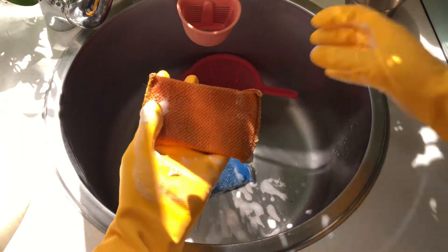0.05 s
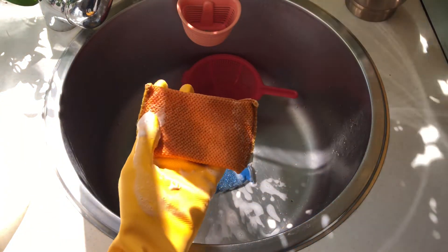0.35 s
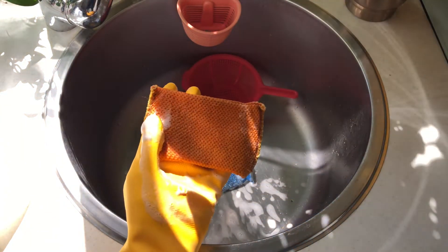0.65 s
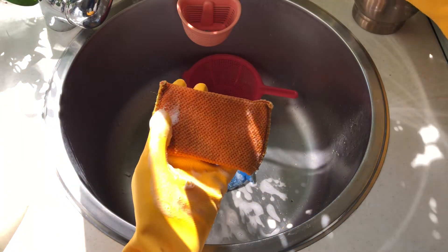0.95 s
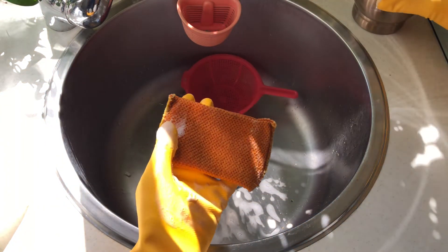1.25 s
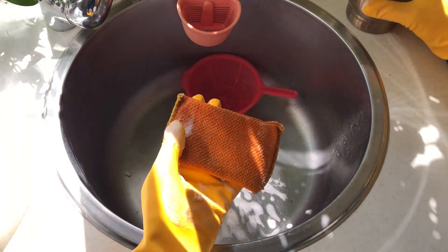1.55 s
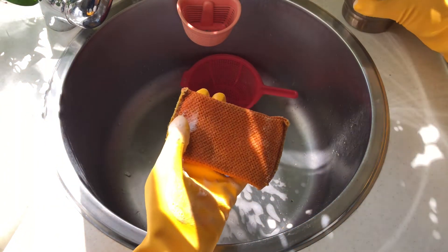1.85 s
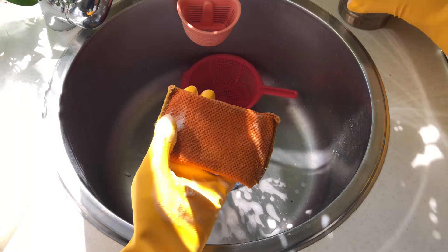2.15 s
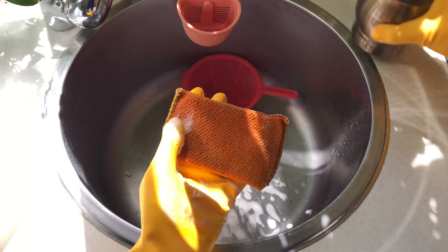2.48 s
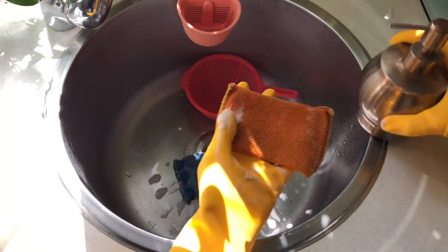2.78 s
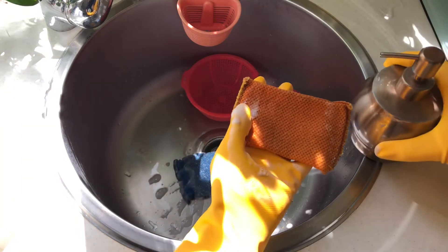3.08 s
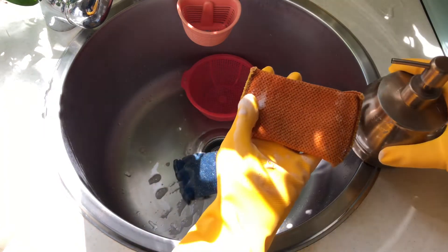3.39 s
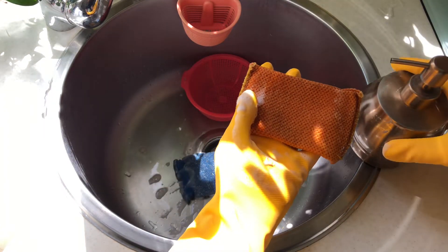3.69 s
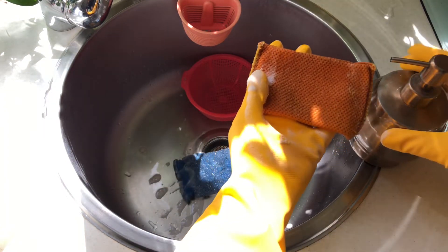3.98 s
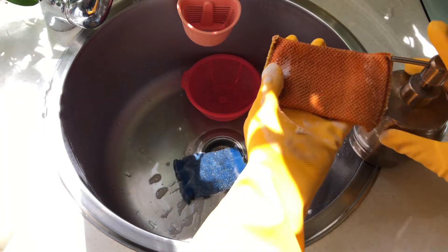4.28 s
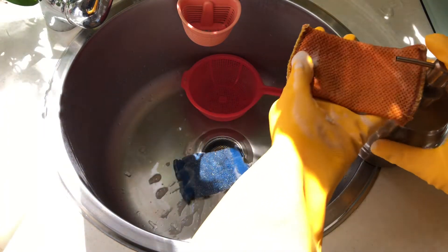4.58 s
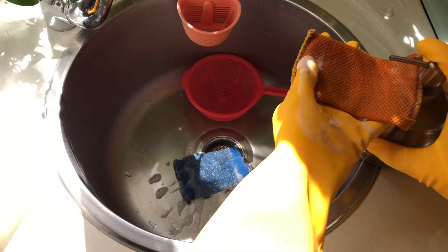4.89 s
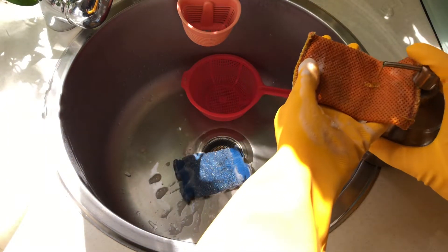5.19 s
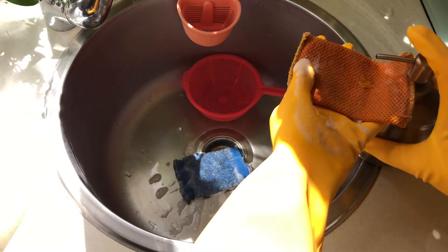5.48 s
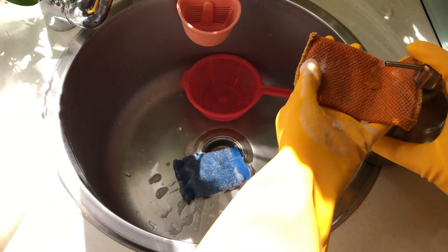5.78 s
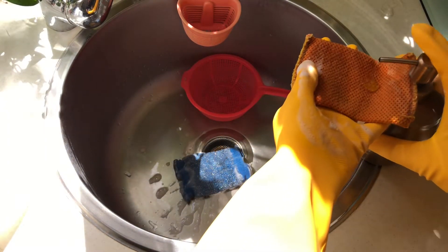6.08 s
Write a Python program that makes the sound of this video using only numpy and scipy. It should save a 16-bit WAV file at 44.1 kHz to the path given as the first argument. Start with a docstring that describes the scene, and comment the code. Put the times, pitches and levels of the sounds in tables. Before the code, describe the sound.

Heard up close at a kitchen sink, a metal soap bottle scrapes over the counter in little jerks and bumps down on its base. Three ringing knocks against the steel rim make the basin boom, followed by a short groaning scrape. Then the pump gives low clunks and small spits of soap. Soft rubber glove rustling on a wet sponge and a low room murmur run underneath.

```python
"""In a small, quiet kitchen, rubber gloves rustle and tick on a wet sponge at a steel sink. One hand shoves
a metal soap dispenser over the counter: it scrapes by stick-slip friction and rocks onto its cushioned foot.
Then it knocks against the rim, so that its shell rings and counter and basin boom, and drags groaning along
the steel. After a light knock and a brief judder, the pump clunks and spits soap onto the sponge.
At last the hands come to rest."""
import sys
import numpy as np
from scipy import signal
from scipy.fft import rfft, irfft
from scipy.io import wavfile

SR = 44100
rng = np.random.default_rng(int(sys.argv[2]) if len(sys.argv) > 2 else 0)


def waveform_to_disk(signal):
    """Save audio, clipped to [-1, 1], as 16-bit WAV at the path in sys.argv[1]."""
    frames = np.transpose(np.atleast_2d(signal))
    scaled = np.clip(frames, -1, 1) * 32767
    samples = np.round(scaled).astype(np.int16)
    wavfile.write(sys.argv[1], SR, samples)


N = 275625

# modes of counter and basin: pitch_hz, level_db, t60_s
COUNTER_MODES = [(116.6, -12, 0.28), (157.5, -5, 0.2), (226, -20, 0.34), (251, 1, 0.039), (290.7, 1, 0.34),
                 (353, -10.5, 0.2), (418.4, 0, 0.14), (505.6, -5.5, 0.17), (610, -8, 0.075),
                 (645, -7, 0.14), (814, -19.5, 0.48), (919, -12, 0.19)]
# noise spectrum of a dull thud: frequency_hz, level_db, t60_s
THUD_BANDS = [(40, -30, 0.17), (105, 7.5, 0.21), (192, 4, 0.094), (300, -7, 0.57), (550, -7, 0.29),
              (970, -1, 0.04), (1670, -1.5, 0.074), (2220, -21, 0.08), (4140, -14.5, 0.05),
              (7000, -43, 0.042)]
# noise spectrum of a small snap: frequency_hz, level_db, t60_s
SNAP_BANDS = [(500, -6, 0.026), (1620, 1.5, 0.042), (2780, -3.5, 0.056), (4100, -19, 0.037),
              (7100, -8.5, 0.013), (8800, -29, 0.06), (12900, -17, 0.041), (15900, -30, .02)]


def undb(db):
    """Amplitude grows tenfold for every 20 decibels."""
    return 10 ** (np.asarray(db) / 20)


def unit(x):
    """Normalisation to an rms of 1."""
    return x / np.sqrt(np.mean(x ** 2))


def seconds():
    """Time axis of one transient."""
    return np.arange(SR * 2 // 3) / SR


def add(out, start_s, sound):
    """Superposition: a sound adds to the mix from its start time on."""
    i = int(start_s * SR)
    out[i:i + len(sound)] += sound[:N - i]


def at_hz(hz, table, column=1):
    """Interpolation of a spectrum's column on a log-frequency axis."""
    table = np.array(table)
    return np.interp(np.log(hz + 1e-9), np.log(table[:, 0]), table[:, column])


def tint(x, spectrum, peaks=(), peak_db=0):
    """Source and filter: x takes on a broad spectrum with Lorentzian resonances standing on it."""
    hz = np.fft.rfftfreq(len(x), 1 / SR)
    lift = sum(undb(db + peak_db) ** 2 / (1 + (2 * (hz - f) / width) ** 2) for f, width, db in peaks)
    return irfft(rfft(x) * undb(at_hz(hz, spectrum)) * np.sqrt(1 + lift), len(x))


def wander(per_s):
    """Slow random modulation: straight lines between Gaussian values of spread 1."""
    knots = rng.standard_normal(N // 50)
    return np.interp(np.arange(N) / SR * per_s, np.arange(len(knots)), knots)


def grains(per_s, spread_db):
    """Shot noise: tiny clicks at random times, a few much bigger than the rest."""
    hit = rng.random(N) < per_s / SR
    return unit(hit * rng.choice([-1, 1], N) * undb(spread_db * np.minimum(rng.exponential(size=N), 4)))


def ring(modes, split=0):
    """Damped modes of alternating sign; in a shell not quite round, each splits into a beating pair."""
    t, out = seconds(), 0
    for k, (hz, db, t60) in enumerate(modes):
        offset_hz = hz * split * (rng.random() + .5)
        pair = np.sin(2 * np.pi * hz * t) * np.cos(2 * np.pi * offset_hz * t)
        out = out + (-1) ** k * undb(db) * pair * np.exp(-np.log(1000) * t / t60)
    return out


def burst(bands, count=18):
    """Modal overlap: dense modes merge into noise that decays at its own rate in each band."""
    t, out = seconds(), 0
    noise = rfft(unit(tint(rng.standard_normal(len(t)), bands)))
    hz, centres = np.fft.rfftfreq(len(t), 1 / SR), np.geomspace(50, 16000, count)
    for centre, weights in zip(centres, np.eye(count)):
        band = irfft(noise * np.interp(hz, centres, weights), len(t))
        out = out + band * np.exp(-np.log(1000) * t / at_hz(centre, bands, column=2))
    return out


def stroke(peak_s, rise_s, fall_s, shape=1.38):
    """Speed envelope of a hand movement, peaking at 1; shape 1 is pointed, 2 rounded."""
    t = np.arange(N) / SR - peak_s
    return np.exp(-np.abs(t / np.where(t < 0, rise_s, fall_s)) ** shape)


def background():
    """Cavity resonance: the hollow of the basin colours the low murmur of the room."""
    # room noise: frequency_hz, level_db
    murmur = [(15, -44), (25, -13.5), (64, 4.5), (140, -4), (173, -6.5), (281, -2), (378, -17), (523, -9),
              (582, -16), (848, -16.5), (1110, -20), (1620, -24.5), (1950, -22), (2120, -27.5),
              (15500, -43)]
    # basin resonances: centre_hz, width_hz, level_db
    basin = [(297, 50, 1.0), (395, 81, 8.0), (490, 16.5, -27.0), (976, 190, -0.5)]
    air = unit(tint(rng.standard_normal(N), murmur, basin, peak_db=-0.5))
    return air * undb(.8 * wander(per_s=6) - 57)


def room(x, wet_db=-9, build_s=0.0017):
    """Reverberation: reflections from close tiled walls build a short, dense tail."""
    # tail spectrum: frequency_hz, level_db, t60_s
    bands = [(97, -2, 0.39), (300, -9, 0.51), (920, -4.5, 0.42), (2090, -9.5, 0.45),
             (5000, -7, 0.27), (15000, -3, 0.17)]
    tail = burst(bands) * swell(build_s)
    return x + undb(wet_db) * signal.fftconvolve(x, tail / np.linalg.norm(tail))[:N]


def gloves(creep_db=-68.5, settle_db_per_s=1.0, rest_s=6, fade_s=.12):
    """Friction noise: rubber creeps over damp sponge, louder at each new grip, fading as hands rest."""
    # new grips of the fingers: peak_s, rise_s, fall_s, level_db
    regrips = [(0.25, 0.029, 0.043, -63), (0.41, 0.053, 0.017, -62.5), (1.0, 0.018, 0.07, -66),
               (2.22, 0.23, 0.3, -69.5), (4.3, 0.12, 0.16, -66.5), (5.78, 0.17, 0.24, -70.5)]
    # rubber crackle: frequency_hz, level_db
    rubber = [(400, -20), (1100, -3.5), (2100, 3), (3200, -3.5), (5000, -7.5), (8000, -12.5),
              (15000, -17.5)]
    t = np.arange(N) / SR
    creep = undb(creep_db - settle_db_per_s * t) * np.exp(-np.maximum(t - rest_s, 0) / fade_s)
    grip_power = sum((undb(db) * stroke(*timing)) ** 2 for *timing, db in regrips)
    crackle = unit(tint(grains(per_s=2200, spread_db=3.2), rubber))
    return crackle * undb(2 * wander(per_s=24)) * np.sqrt(creep ** 2 + grip_power)


def tick(db, hz, width_hz, fade_s):
    """Impulsive excitation: a brief crack passes through a heavily damped resonance."""
    t = seconds()
    crack = rng.standard_normal(len(t)) * np.exp(-t / fade_s)
    resonance = signal.iirpeak(hz, hz / width_hz, fs=SR)
    click = unit(signal.lfilter(*resonance, signal.lfilter(*resonance, crack)))
    return undb(db) * click * np.sqrt(fade_s / (2 * t[-1]))


def ticks():
    """Sudden releases make transients: wet rubber peels, the valve clicks, the nozzle spits."""
    # rubber peeling off bottle and sponge: start_s, level_db, centre_hz
    peels = [(0.244, -52, 3600), (0.395, -57.5, 2850), (0.582, -57.5, 2600), (1.032, -53, 2240),
             (1.432, -55, 7150), (2.001, -58.5, 2500), (3.541, -65, 7000), (4.244, -55, 2200),
             (4.432, -61, 2480), (4.483, -63, 4940), (5.091, -66, 6000), (5.523, -69, 7000),
             (5.683, -62.5, 5260)]
    # pump valve just ahead of a stroke: start_s, level_db
    valve_clicks = [(4.703, -57), (4.902, -48)]
    # soap and air leaving the nozzle: start_s, level_db
    spits = [(5.262, -43.5), (5.926, -41), (5.995, -52)]
    out = np.zeros(N)
    for start_s, db, hz in peels:
        add(out, start_s, tick(db, hz, width_hz=0.99 * hz, fade_s=0.005))
    for start_s, db in valve_clicks:
        add(out, start_s, tick(db, hz=12500, width_hz=7000, fade_s=0.0027))
    for start_s, db in spits:
        add(out, start_s, tick(db, hz=1840, width_hz=500, fade_s=0.0039))
    return out


def grit(whistle_db=-12):
    """Roughness noise: fine scratching excites high modes that flare up as the contact point moves."""
    # high resonances of the base: centre_hz, width_hz, level_db
    resonances = [(5410, 210, 6.5), (6340, 320, 4), (7810, 90, 2.5), (8160, 110, 1.5), (9500, 910, 3),
                  (11140, 190, -2.5), (13200, 300, -5), (14700, 250, -11)]
    # scratching hiss: frequency_hz, level_db
    hiss = [(3000, 1.5), (5000, 2.5), (9000, -1), (12000, -2.5), (16000, -1.5)]
    scratch, whistles = grains(per_s=2200, spread_db=2.2), 0
    for hz, width_hz, db in resonances:
        whistle = unit(signal.lfilter(*signal.iirpeak(hz, hz / width_hz, fs=SR), scratch))
        whistles = whistles + undb(db + whistle_db + 4 * wander(per_s=35)) * whistle
    return unit(unit(tint(scratch, hiss)) + whistles)


def rim_drag(jerks, slips, hiss, start_s=2.965, attack_s=0.032, hold_s=0.083, release_s=0.1):
    """Friction drives the rim's resonances; as the base slows, the hiss dies first, the groan last."""
    # steel rim resonances: centre_hz, width_hz, level_db
    rim = [(417, 62, 9), (495.6, 36, -7), (790, 15, 0.5), (1920, 40, -4), (3195, 36, 2), (3220, 25, 3),
           (3490, 55, -1), (4130, 26, 2.5)]
    # low groan: frequency_hz, level_db
    groan_spectrum = [(70, -26), (180, -16), (260, -12), (350, -14), (500, -4.5), (650, -13), (850, -7),
                      (1100, -19), (2000, -50)]
    # bright scrape: frequency_hz, level_db
    scrape_spectrum = [(600, -30), (1100, -12), (1700, 5.5), (2400, -8.5), (4300, 0.5), (6000, -39)]
    t = np.arange(N) / SR - start_s
    onset = np.clip(t / attack_s, 0, 1)
    slowing_s = np.maximum(t - attack_s - hold_s, 0)
    speed = onset * np.exp(-(slowing_s / release_s) ** 2)
    lingering = onset * np.exp(-(slowing_s / 0.14) ** 2)
    groan = undb(-50.5) * unit(tint(jerks, groan_spectrum, rim, peak_db=15))
    scrape = undb(-54.5) * unit(tint(slips, scrape_spectrum, rim, peak_db=15))
    return lingering * groan + speed * scrape + speed ** 2.1 * undb(-55) * hiss


def slides(rumble_lag_s=0.0058):
    """Stick-slip friction: coarse jerks of the base shake counter or rim, fine slips excite the metal."""
    # shoves over the counter: peak_s, rise_s, fall_s, rumble_db, scrape_db, hiss_db
    shoves = [(0.725, 0.036, 0.048, -43.5, -58.5, -74), (0.795, 0.054, 0.05, -51.5, -52.5, -49),
              (0.855, 0.023, 0.055, -41, -53.5, -67), (1.473, 0.037, 0.04, -41.5, -53, -59),
              (1.575, 0.052, 0.041, -46, -59.5, -67), (2.135, 0.065, 0.023, -45.5, -58.5, -63),
              (2.345, 0.087, 0.038, -42.5, -54.5, -63.5), (2.483, 0.066, 0.033, -49, -60.5, -68.5),
              (3.962, 0.017, 0.041, -51, -57, -63)]
    # counter rumble: frequency_hz, level_db
    rumble_spectrum = [(60, -11.5), (120, -9), (210, 0), (290, 6), (380, -7), (560, -7.5), (720, -19.5),
                       (850, -19.5), (1100, -35), (2000, -54)]
    # metal scrape: frequency_hz, level_db
    scrape_spectrum = [(500, -14), (1000, 1.5), (1700, 4.5), (2400, 0.5), (4300, 0), (6000, -18)]
    # low resonances of the base: centre_hz, width_hz, level_db
    base = [(1330, 15, 2.5), (1660, 90, -3), (1990, 23, 3.5), (3166, 30, 1.5), (3490, 85, -29),
            (4120, 37, 0)]
    jerks, slips, hiss = grains(per_s=770, spread_db=2), grains(per_s=1000, spread_db=2), grit()
    rumble = unit(tint(jerks, rumble_spectrum))
    scrape = unit(tint(slips, scrape_spectrum, base, peak_db=8.5))
    out = rim_drag(jerks, slips, hiss)
    for peak_s, rise_s, fall_s, rumble_db, scrape_db, hiss_db in shoves:
        out += stroke(peak_s, rise_s, fall_s) * (undb(scrape_db) * scrape + undb(hiss_db) * hiss)
        out += stroke(peak_s + rumble_lag_s, rise_s, fall_s) * undb(rumble_db) * rumble
    return out * undb(1.37 * wander(per_s=90) - 2)


def judder(start_s=3.928, length_s=.1, hz=362, db=-46.5):
    """Mode locking: the slipping briefly follows one mode of the bottle, a hollow hum."""
    progress = np.clip((np.arange(N) / SR - start_s) / length_s, 0, 1)
    pitch_hz = hz * (1 + .025 * wander(per_s=80))
    return undb(db) * np.sin(np.pi * progress) ** 2 * np.sin(2 * np.pi * np.cumsum(pitch_hz) / SR)


def swell(rise_s):
    """Gradual onset, as when a cushioned contact builds up its force."""
    return 1 - np.exp(-(seconds() / rise_s) ** 2)


def flex(hz, lag_s=0.006):
    """Bending wave: the counter dips and springs back, and the slow wave arrives after the click."""
    cycles = (seconds() - lag_s) * hz
    return -np.cos(2 * np.pi * cycles) * np.exp(-(cycles / .75) ** 2)


def pumps():
    """Force transmission: the snapping plunger presses the filled bottle onto the counter, a low clunk."""
    # plunger catching and bottoming: start_s, body_db, push_s, flex_db, snap_db
    plunges = [(4.716, -46, 0.0037, -50, -60), (4.9023, -30, 0.0039, -26.5, -40),
               (5.153, -53.5, 0.0044, -53, -91), (5.719, -44, 0.0079, -44.5, -87)]
    # modes of the pressed bottle: pitch_hz, level_db, t60_s
    pressed_modes = [(95.9, -6, 0.47), (112, -20, 0.23), (143.4, -1.5, 0.17), (309, -15, 0.44),
                     (370, 7, 0.085), (375, -5, 0.034), (412.4, -8.5, 0.29), (785, -7.5, 0.048),
                     (1000, -9, 0.06)]
    out = np.zeros(N)
    for start_s, body_db, push_s, flex_db, snap_db in plunges:
        body = undb(body_db) * swell(push_s) * (ring(pressed_modes) + undb(-8.5) * burst(THUD_BANDS))
        bend = undb(flex_db) * flex(hz=309, lag_s=0.00805)
        add(out, start_s, body + bend + undb(snap_db) * burst(SNAP_BANDS))
    return out


def bumps(note_t60_s=0.11):
    """Cushioned impact: a small snap, then a dull thud with a hollow note that depends on the spot."""
    # bottle rocking onto its foot: start_s, push_s, flex_db, boom_db, note_hz, note_db, thud_db, snap_db
    landings = [(0.213, 0.0023, -74, -62, 728, -58, -54, -53),
                (0.847, 0.0063, -42, -52.5, 556, -34, -37.5, -77),
                (1.881, 0.0025, -27, -38, 649, -30, -29, -42.5)]
    out = np.zeros(N)
    for start_s, push_s, flex_db, boom_db, note_hz, note_db, thud_db, snap_db in landings:
        note = ring([(note_hz, note_db, note_t60_s)])
        body = note + undb(thud_db) * burst(THUD_BANDS) + undb(boom_db) * ring(COUNTER_MODES)
        snap = undb(snap_db) * burst(SNAP_BANDS)
        add(out, start_s, snap + swell(push_s) * body + undb(flex_db) * flex(hz=264))
    return out


def knocks():
    """Hard impact excites the modes of shell, counter and basin; a longer contact gives less treble."""
    # blows of the metal base: start_s, flex_db, boom_db, ring_db, clack_db, cutoff_hz
    blows = [(2.664, -17.5, -25, -28, -25.5, 9300), (2.8413, -26, -34.5, -40, -28.5, 10900),
             (2.8668, -24, -32, -40.5, -30.5, 14000), (3.2862, -49, -58, -66, -55, 12000)]
    # modes of the bottle's shell: pitch_hz, level_db, t60_s
    shell_modes = [(1462, -5, 0.34), (1568, 1.5, 0.1), (1560, -27, .07), (1850, -14.5, 0.27),
                   (1994, -10, 0.39), (2107, -5, 0.068), (2234, 0, 0.061), (2720, -12, 0.13),
                   (2800, -10, 0.18), (3110, -9, 0.17), (3311, -9, 0.25), (3453, 1, 0.11), (3563, -2, 0.17),
                   (3990, -3.5, 0.12), (4140, -7, 0.086), (5000, -2.5, 0.023), (5600, 3, 0.029),
                   (6380, -6, 0.085), (7700, -13, 0.042), (8160, -12, .13), (9070, -14, 0.1),
                   (11100, -5.5, 0.092), (14700, 2, 0.06)]
    # noise spectrum of the clack: frequency_hz, level_db, t60_s
    clack_bands = [(25, -23, 0.2), (80, 1, 0.48), (280, 11.5, 0.19), (630, 5.5, 0.2), (1180, -10, 0.13),
                   (1620, 3, 0.072), (3840, -7, 0.19), (6430, -2, 0.026), (10000, -4, 0.08),
                   (15800, -15.5, 0.049)]
    out = np.zeros(N)
    for start_s, flex_db, boom_db, ring_db, clack_db, cutoff_hz in blows:
        metal = undb(ring_db) * ring(shell_modes, split=0.003) + undb(clack_db) * burst(clack_bands)
        softened = signal.lfilter(*signal.butter(1, cutoff_hz, fs=SR), metal)
        counter = undb(flex_db) * flex(hz=270) + undb(boom_db) * ring(COUNTER_MODES)
        add(out, start_s, softened + counter)
    return out


def scene(bass_cut_hz=37):
    """Superposition of all sources above the sink; the counter radiates little of the deepest bass."""
    bottle = slides() + judder() + knocks() + bumps() + pumps()
    bottle = signal.sosfilt(signal.butter(1, bass_cut_hz, "high", fs=SR, output="sos"), bottle)
    return (background() + room(bottle + gloves() + ticks()))[None]


def record(dry):
    """Band limiting: a steep low-pass removes the treble above 15850 Hz."""
    return signal.sosfilt(signal.ellip(10, .2, 80, 15850, fs=SR, output="sos"), dry)


dry = scene()
out = record(dry)
waveform_to_disk(out)
```